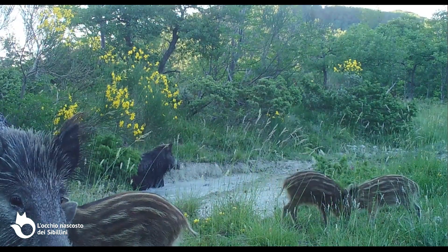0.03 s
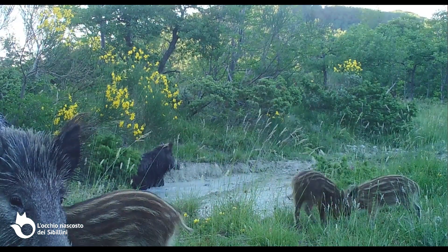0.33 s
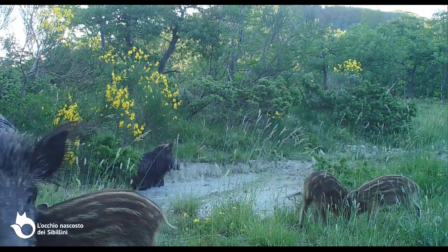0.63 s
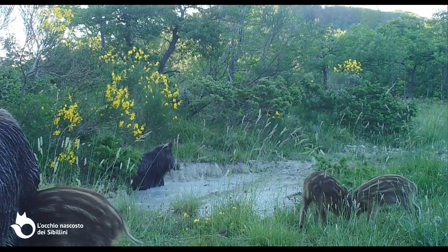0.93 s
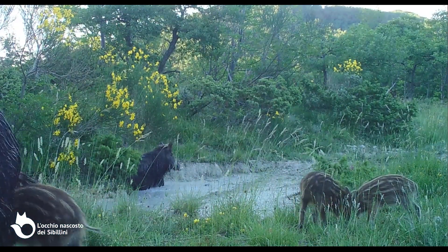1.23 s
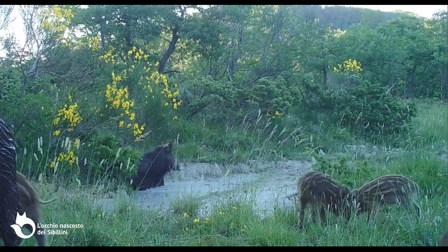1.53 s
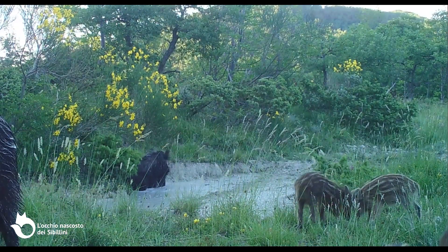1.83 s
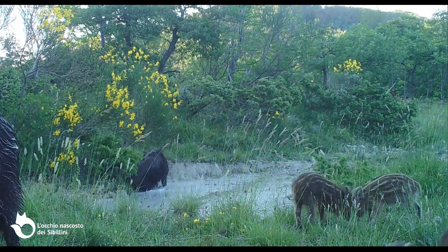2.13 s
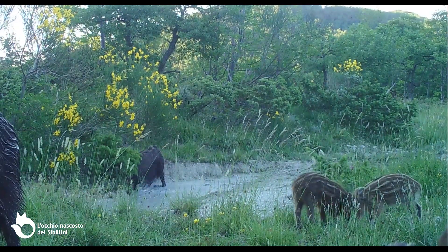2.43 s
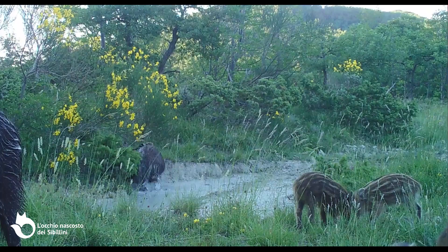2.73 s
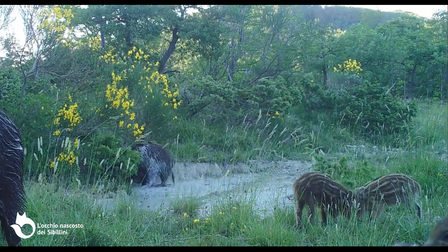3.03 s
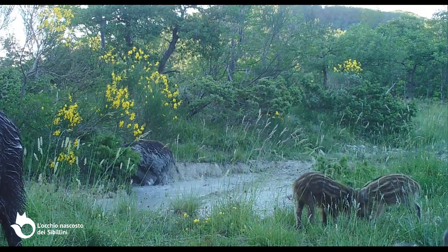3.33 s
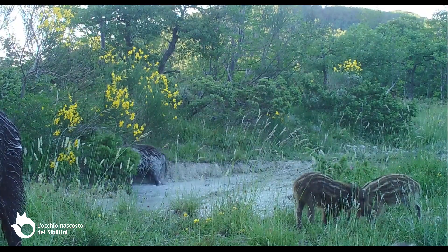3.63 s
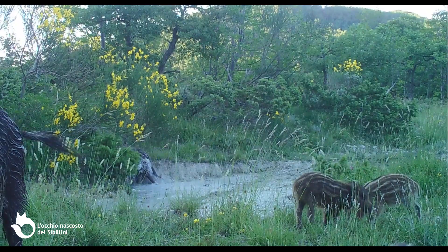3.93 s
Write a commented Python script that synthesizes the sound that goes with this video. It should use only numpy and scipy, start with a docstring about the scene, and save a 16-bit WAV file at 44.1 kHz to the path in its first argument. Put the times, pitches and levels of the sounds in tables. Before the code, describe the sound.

Wild boars rustle through dry grass close by, with crisp swishes and snapping stems.

```python
"""Wild boars shift and root in dry meadow grass right beside a fixed trail camera.
Each push through the grass is a swish of tiny stalk clicks; single stems snap and twigs knock dully.
The microphone port rings near 4 and 12 kHz, heard as peaks in the tone of the clicks.
Behind it all lie a low outdoor rumble, hiss and the camera's faint hum."""
import sys
import numpy as np
from scipy import signal
from scipy.fft import rfft, irfft, next_fast_len
from scipy.io import wavfile
from scipy.ndimage import uniform_filter1d, map_coordinates

SR = 44100
rng = np.random.default_rng(int(sys.argv[2]) if len(sys.argv) > 2 else 0)


def bounce(signal):
    """Save signal as a 16-bit WAV file at the path given by the first command-line argument."""
    frames = np.transpose(np.atleast_2d(signal))
    limited = np.clip(frames, -1, 1)
    pcm = np.round(limited * 32767).astype(np.int16)
    wavfile.write(sys.argv[1], SR, pcm)


N = 176400

# tone of the outdoor rumble and hiss: pitch_hz, level_db
AIR_TONE = [(12, -15.5), (20, -4), (50, -9.5), (98, -13.5), (140, -16.5), (217, -21), (376, -27),
            (928, -38), (1480, -41), (1890, -44), (2700, -45.5), (3400, -50.5), (4080, -48.5), (5500, -50),
            (7450, -51.5), (10000, -50.5), (12500, -47.5), (14000, -58)]
# the camera's hum: multiple_of_base_pitch, level_db
HUM_PARTS = [(1, -52), (2, -58.5), (3, -65), (5, -68), (6, -72)]
# dull knocks of twigs: start_s, pitch_hz, level_db, fade_s (time to drop 60 dB)
KNOCKS = [(0.653, 2400, -42, .015), (.669, 1472, -47, 0.064), (1.091, 1090, -48.5, 0.016),
          (1.289, 1680, -46.5, 0.019), (1.4179, 1390, -37.5, 0.014), (2.3054, 1230, -46.5, 0.0098),
          (3.299, 2680, -53, 0.022), (3.568, 3030, -54.5, 0.026), (3.646, 1490, -58, .02)]
# stems that snap: start_s, level_db, pitch_hz, fizz_db (compared with the crack)
SNAPS = [(.198, -50.5, 4170, 5.5), (0.2509, -43, 4000, -3.5), (.395, -48, 4100, -1),
         (0.4607, -42, 4020, -12), (0.478, -44, 4100, 8), (.581, -44.5, 4220, 1), (.626, -28, 4300, -22),
         (0.6515, -29, 4350, -20), (0.6676, -33, 4360, -17), (0.7113, -35.5, 4330, 7.5),
         (0.723, -28, 4900, -2), (0.8184, -32, 4050, -11), (0.8987, -29, 4100, -15), (.902, -33.5, 4350, 0),
         (0.9846, -38, 4380, -22), (1.016, -36, 4340, -8), (1.045, -35, 4170, -12), (1.0722, -37, 4100, -8),
         (1.0914, -27, 4900, -17), (1.241, -41, 4300, -8), (1.257, -30, 3900, -14),
         (1.262, -42.5, 3240, -20), (1.2882, -34.5, 3750, -29), (1.3223, -38.5, 4230, -4),
         (1.4001, -38, 4800, -4), (1.4378, -31.5, 4220, -24), (1.4675, -37, 4400, -13),
         (1.48, -36, 4100, -23), (1.5199, -39.5, 4170, 0.5), (1.5957, -30, 4160, -23),
         (1.7038, -44.5, 4250, 2), (1.885, -43, 4200, -19), (1.9452, -41.5, 4050, -3),
         (1.9604, -38, 3960, 1), (2.2771, -42, 3730, -14), (2.2808, -28, 4420, -16),
         (2.284, -31.5, 4000, -28), (2.2967, -32, 3900, -19), (2.427, -47.5, 4700, 0),
         (2.619, -44.5, 3900, -1), (3.0258, -42, 3880, 1), (3.499, -41.5, 3810, -2),
         (3.588, -48.5, 4100, -3), (3.758, -44.5, 3910, -21)]
# how a breaking stem rings: multiple_of_pitch, level_db
STEM_TONE = [(.4, -36.5), (.78, -20), (.9, -4.5), (1, -1), (1.1, -4), (1.25, -18), (1.8, -36.5)]
# tones of a stalk click (rasp in a push, rasp in stirring, high fizz, low crunch): pitch_hz, level_db
PUSH_RASP = [(1000, -44), (2300, -21), (3200, -16), (3700, -2), (4100, 3.5), (4550, -5), (5100, -9.5),
             (5700, -11.5), (6150, -14.5), (6600, -17.5), (7400, -21.5), (14000, -43)]
STIR_RASP = [(1000, -33.5), (2300, -24), (3300, -13.5), (3750, -6), (4050, -2), (4450, -10), (5000, -15),
             (6500, -23.5), (14000, -45)]
FIZZ = [(3000, -40), (5300, -2.5), (6500, -6), (7400, -5), (8600, 1), (10000, -3), (11300, 1.5),
        (12400, 5.5), (13700, -6)]
CRUNCH = [(150, -17), (450, -2.5), (700, -4), (1000, -5.5), (1500, -2.5), (1900, -3.5), (2400, -4),
          (3200, -1.5), (5000, -37.5)]
# how strongly the grass stirs: time_s, level_db
STIR_LEVELS = [(0, -68), (.33, -67), (.42, -58), (.57, -70), (.78, -63), (1.1, -58.5), (1.36, -62),
               (1.55, -61), (1.85, -62), (2.08, -72), (2.4, -65.5), (2.53, -71.5), (2.72, -64.5),
               (2.89, -64), (2.98, -67.5), (3.12, -62), (3.4, -68), (3.7, -69), (4, -65)]
# pushes through the grass: peak_s, level_db, rise_s, fall_s, fizz_db, crunch_db
# rise and fall each span 20 dB; fizz and crunch are compared with the rasp
PUSHES = [(.015, -56.5, 0.044, 0.065, -17.5, -20), (0.466, -46.5, 0.022, 0.082, -11.5, -8.5),
          (0.531, -47, 0.043, 0.034, -3.5, -7.5), (.605, -48, .035, .05, -8, -12.5),
          (.628, -43, .03, 0.056, -19, -10), (.673, -46, 0.062, 0.092, -15, -8.5),
          (0.714, -44, 0.13, 0.037, -3.5, -19), (.81, -55, 0.071, 0.12, -3.5, -39),
          (.908, -48, 0.054, 0.04, -9.5, -18), (0.986, -53, 0.033, 0.051, -8, -15),
          (1.025, -49, 0.031, 0.052, -3.5, -9), (1.093, -41.5, 0.026, 0.05, -4.5, -18),
          (1.254, -48, 0.073, .05, -9, -23), (1.432, -50, 0.066, 0.084, -7.5, -13),
          (1.481, -53.5, 0.042, 0.035, -7, -29), (1.602, -50.5, 0.032, 0.048, -14, -14.5),
          (1.803, -52, .07, 0.058, -21, -16), (1.957, -55, .03, .03, -6, -12),
          (2.015, -58.5, .03, 0.042, -9, -19), (2.304, -57.5, 0.022, 0.036, -3, -0.5),
          (3.035, -58.5, 0.011, 0.044, -9, -6.5), (3.202, -59.5, 0.063, 0.043, -6, -3),
          (3.5, -61.5, 0.023, .06, -3, -4)]


def gain(db):
    """Turn decibels into a number to multiply by."""
    return 10 ** (np.asarray(db) / 20)


def normalize(sound):
    """Scale a sound to an average power of 1."""
    return sound / np.sqrt(np.mean(sound ** 2) + 1e-20)


def tone_gains(tone, size):
    """Turn a tone table into one gain for each frequency of an FFT."""
    hz, db = np.transpose(tone)
    grid_hz = np.fft.rfftfreq(size, 1 / SR)
    return gain(np.interp(np.log(grid_hz + 1), np.log(hz + 1), db))


def ring(sound, tone, size=1024):
    """Filter a sound so that it rings with the given tone."""
    # minimum-phase filter: the ringing comes after each click, never before
    cepstrum = irfft(np.log(tone_gains(tone, size)))
    cepstrum[1:size // 2] *= 2
    cepstrum[size // 2 + 1:] = 0
    response = irfft(np.exp(rfft(cepstrum)))
    return signal.fftconvolve(sound, response / np.linalg.norm(response))[:len(sound)]


def wobble(per_s):
    """A smooth curve through per_s random values a second."""
    points = rng.standard_normal(int(N * per_s / SR) + 4)
    return map_coordinates(points, [np.arange(N) * per_s / SR])


def fade(t, fade_s):
    """Die away by 60 dB every fade_s seconds."""
    return np.exp(-np.log(1000) * t / fade_s)


def add(track, start_s, sound):
    """Mix a sound into the track at start_s."""
    part = track[max(round(start_s * SR), 0):][:len(sound)]
    part += sound[:len(part)]


def outdoor_air(level_db=-52.5):
    """Steady noise, shaped into a low rumble and a soft hiss."""
    size = next_fast_len(N + 8192)
    spectrum = rfft(rng.standard_normal(size)) * tone_gains(AIR_TONE, size)
    return gain(level_db) * normalize(irfft(spectrum, size)[:N])


def camera_hum(base_hz=29.4):
    """The camera hums faintly at one low pitch and a few multiples of it."""
    t = np.arange(N) / SR
    return sum(gain(db) * np.sqrt(2) * np.sin(2 * np.pi * (multiple * base_hz * t + rng.random()))
               for multiple, db in HUM_PARTS)


def bush_echo(sound, level_db=-19, fade_s=0.11):
    """The bushes scatter the sound into a short, soft echo."""
    t = np.arange(SR // 4) / SR
    tail = rng.standard_normal(len(t)) * fade(t, fade_s)
    return gain(level_db) * signal.fftconvolve(sound, tail / np.linalg.norm(tail))[:N]


def twig_knocks(attack_s=0.0003, roughness=0.2):
    """A jostled twig rings briefly, with a little crunch in its note."""
    track, t = np.zeros(N), np.arange(SR // 10) / SR
    for start_s, hz, db, fade_s in KNOCKS:
        note = np.sin(2 * np.pi * hz * t) + roughness * ring(rng.standard_normal(len(t)), CRUNCH)
        add(track, start_s, gain(db) * note * fade(t, fade_s) * (1 - np.exp(-t / attack_s)))
    return track


def stem_snaps(trim_db=-3.5, crunch_db=-18, attack_s=0.00023):
    """A stem breaks with one crack at its own pitch and a short trail of splinters."""
    track, t = np.zeros(N), np.arange(SR // 20) / SR
    splinters = gain(-12.5) * fade(t, fade_s=0.02)
    shape = (fade(t, fade_s=0.0024) + splinters) * (1 - np.exp(-t / attack_s))
    for start_s, db, hz, fizz_db in SNAPS:
        stem = [(multiple * hz, level_db) for multiple, level_db in STEM_TONE]
        for tone, share_db in ((stem, 0), (FIZZ, fizz_db), (CRUNCH, crunch_db)):
            crack = ring(rng.standard_normal(len(t)) * shape, tone)
            add(track, start_s, gain(db + share_db + trim_db) * crack / abs(crack).max())
    return track


def stalk_clicks(per_s, spread_db, cap_db, rubbing, rasp):
    """Stalks click at random over smooth rubbing, in three layers: rasp, fizz and crunch."""
    hits = rng.random(N) < per_s / SR
    sizes = hits * gain(np.minimum(spread_db * rng.exponential(size=N), cap_db))
    layers = []
    for tone in (rasp, FIZZ, CRUNCH):
        clicks = normalize(sizes * np.sign(rng.standard_normal(N)))
        layers.append(normalize(ring(clicks + rubbing * rng.standard_normal(N), tone)))
    return np.array(layers)


def changing_stalks(sound, depth_db=2.5):
    """Different stalks answer from moment to moment, so the tone keeps shifting."""
    spectrum = signal.stft(sound, nperseg=512)[2]
    patches = uniform_filter1d(rng.standard_normal(spectrum.shape), size=6, axis=0)  # smooth over pitch
    patches = uniform_filter1d(patches, size=4, axis=1)  # and over time
    patch_gains = normalize(gain(depth_db * normalize(patches)))
    return signal.istft(spectrum * patch_gains, nperseg=512)[1][:N]


def grass_stirring(trim_db=-2.5, fizz_db=-9, crunch_db=-13.5, fizz_growth=1.7):
    """Stalks keep ticking between the pushes, fainter and duller as the nearest animal settles."""
    db = np.interp(np.arange(N) / SR, *np.transpose(STIR_LEVELS))
    effort_db = db - db.mean() + 1.7 * wobble(per_s=35)
    rasp, fizz, crunch = stalk_clicks(per_s=1500, spread_db=2, cap_db=16, rubbing=0.35, rasp=STIR_RASP)
    body = gain(effort_db) * (rasp + gain(crunch_db) * crunch)
    treble = gain(fizz_growth * effort_db + fizz_db) * fizz
    return gain(db.mean() + trim_db) * (body + treble)


def boar_pushes(flutter_db=1.2):
    """Each push through the grass swells and dies away, with its own share of fizz and crunch."""
    t, power = np.arange(N) / SR, np.zeros((3, N))
    for peak_s, db, rise_s, fall_s, fizz_db, crunch_db in PUSHES:
        swell = gain(db - 20 * np.maximum((peak_s - t) / rise_s, (t - peak_s) / fall_s))
        power += np.outer(gain([0, fizz_db, crunch_db]), swell) ** 2
    layers = stalk_clicks(per_s=3500, spread_db=1.5, cap_db=8.5, rubbing=0.31, rasp=PUSH_RASP)
    swishes = (np.sqrt(power) * layers).sum(0)
    return gain(flutter_db * wobble(per_s=120)) * swishes


def scene():
    """The boars' rustling and its light echo, over the background, in one channel."""
    grass = changing_stalks(boar_pushes() + grass_stirring())
    nearby = grass + stem_snaps() + twig_knocks()
    return (nearby + bush_echo(nearby) + outdoor_air() + camera_hum())[None]


def record(dry, top_hz=13900):
    """The camera cuts off the highest treble."""
    low_pass = signal.ellip(10, .1, 70, top_hz, fs=SR, output="sos")
    return signal.sosfilt(low_pass, dry)


dry = scene()
out = record(dry)
bounce(out)
```